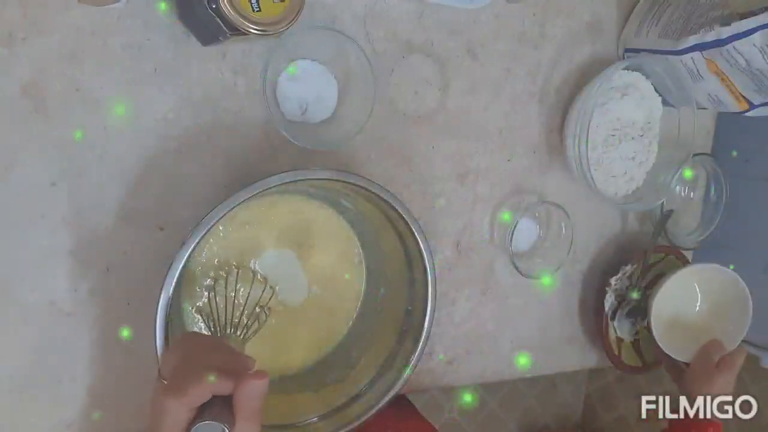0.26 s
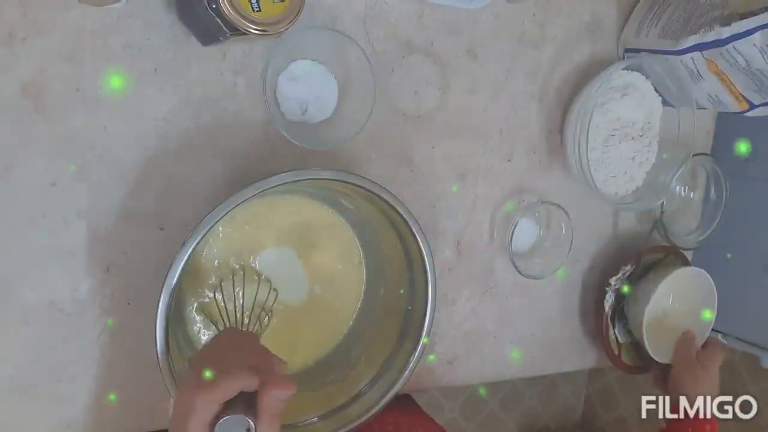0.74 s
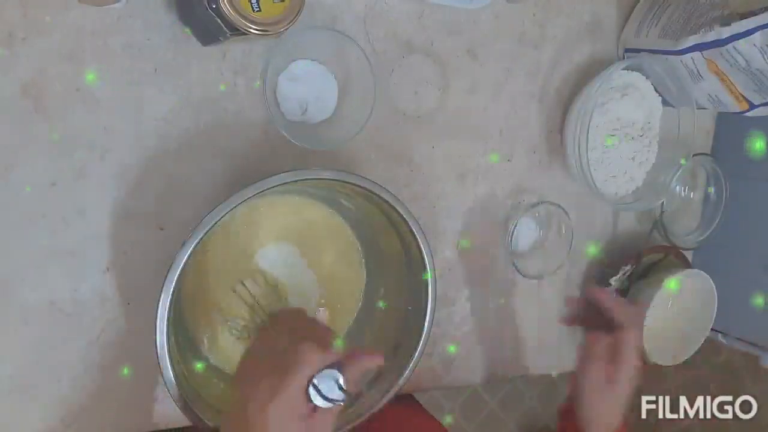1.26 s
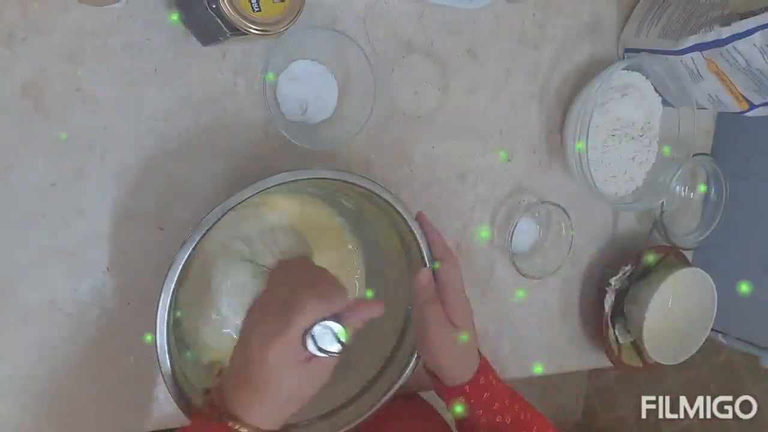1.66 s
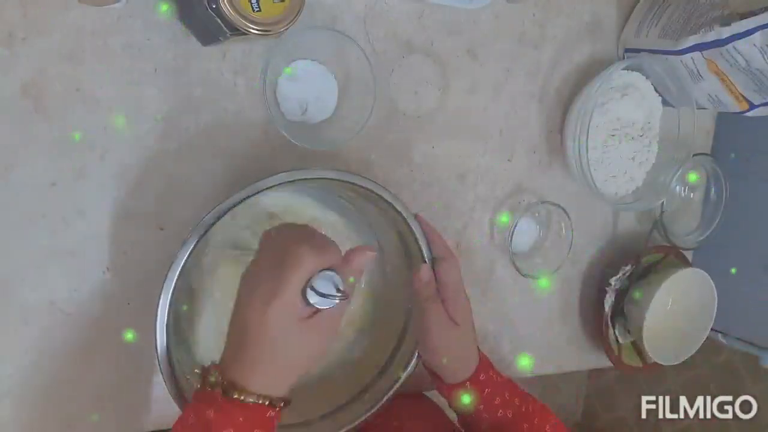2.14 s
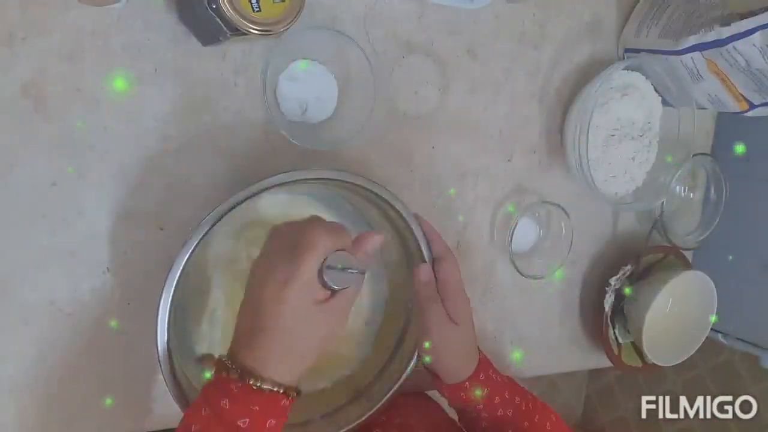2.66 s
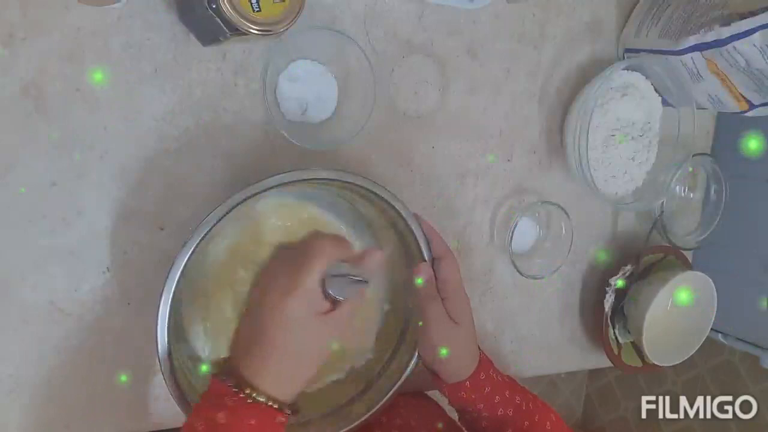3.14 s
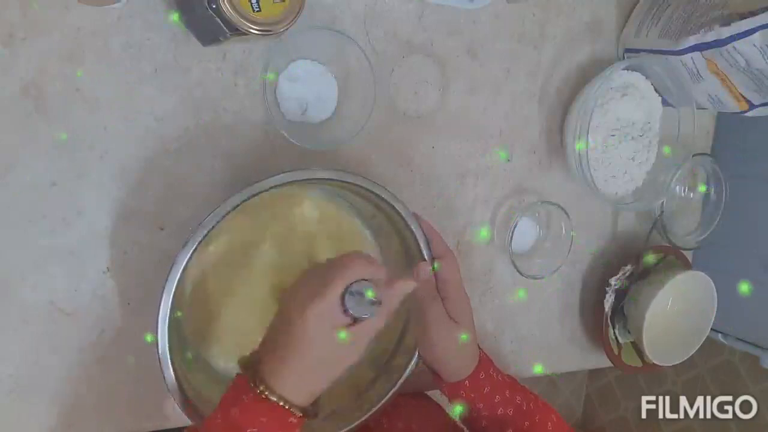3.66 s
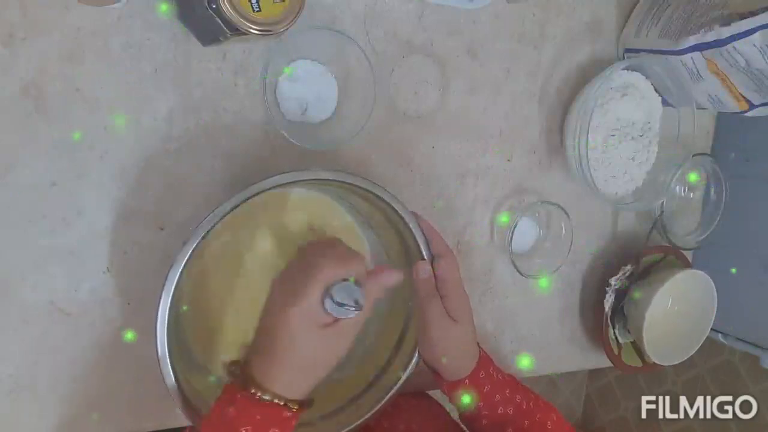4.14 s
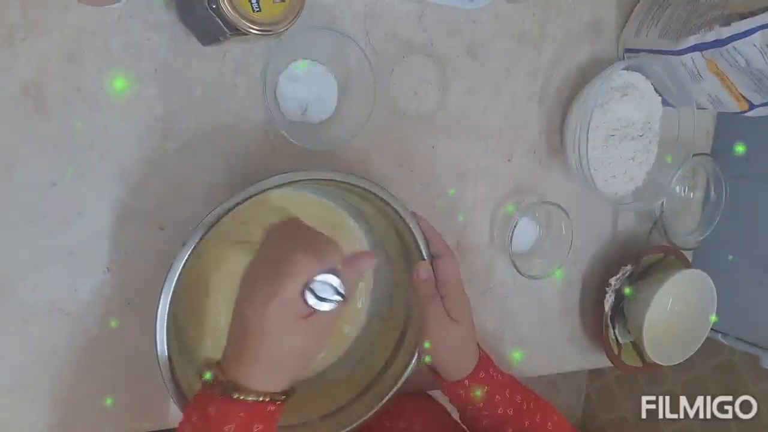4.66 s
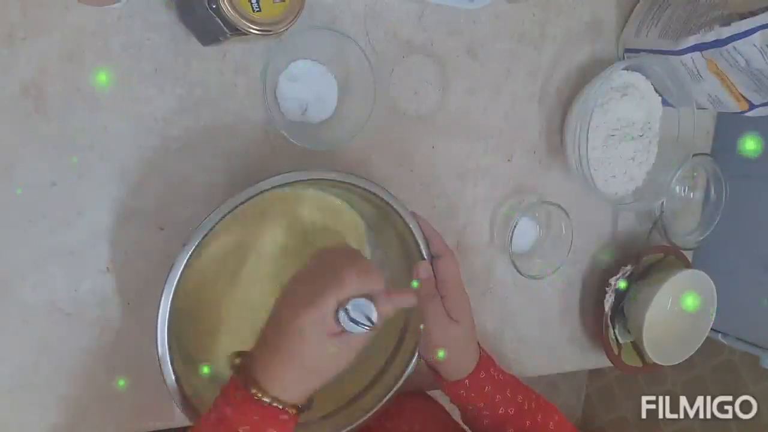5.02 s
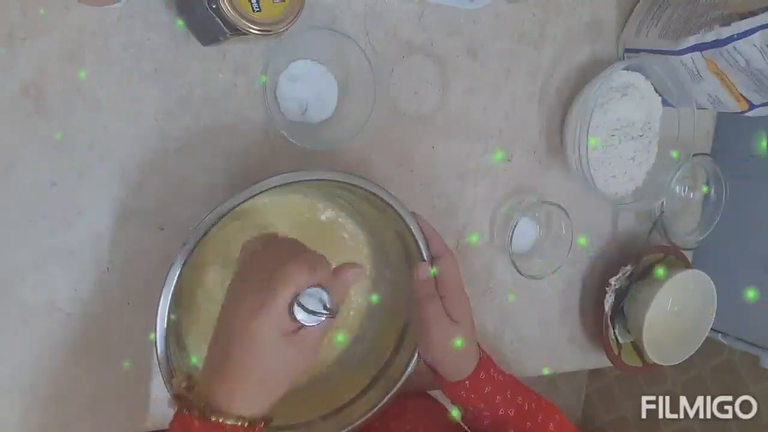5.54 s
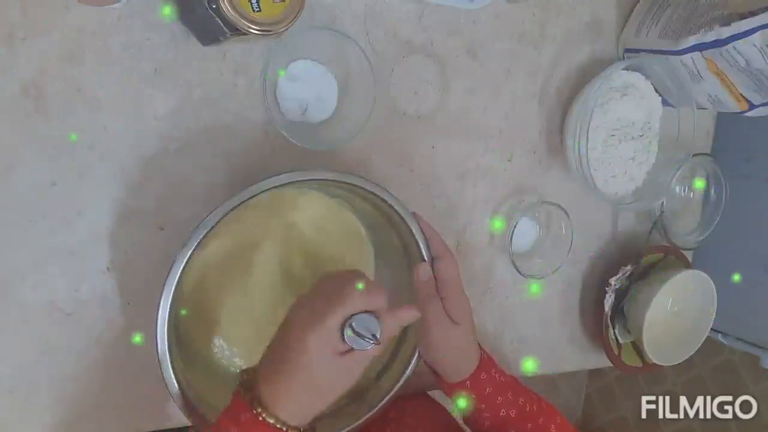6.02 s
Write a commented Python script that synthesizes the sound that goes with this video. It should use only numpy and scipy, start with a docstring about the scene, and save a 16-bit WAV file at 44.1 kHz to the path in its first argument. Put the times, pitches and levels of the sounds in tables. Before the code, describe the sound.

A cup clinks onto a china dish, then a wire whisk swishes through batter, clicking sharply against a ringing steel bowl.

```python
"""At a kitchen table, a cup is set down in a china dish, then batter is whisked in a steel bowl.
The wires swish and squelch through the batter, scrape the steel and click on the wall of the bowl,
which rings. An appliance hums in the room. The close stereo microphone has a limiter, which turns
the sound down for a moment on every hard click."""
import sys
import numpy as np
from scipy import signal
from scipy.fft import rfft, irfft, next_fast_len
from scipy.io import wavfile
from scipy.ndimage import uniform_filter1d

SR = 44100
rng = np.random.default_rng(int(sys.argv[2]) if len(sys.argv) > 2 else 0)


def file_out(sig):
    """Save sig as 16-bit WAV at sys.argv[1]."""
    # one column per channel
    cols = np.atleast_2d(sig).T
    # limit, then scale
    lim = np.clip(cols, -1, 1)
    pcm = np.round(lim * 32767).astype(np.int16)
    wavfile.write(sys.argv[1], SR, pcm)


N = 277279
TIME = np.arange(N) / SR
AGE = TIME[:SR]   # the second after a hit
HAND_ON_RIM_S = 1.6   # from here on a hand holds the bowl

# whisk hits on the bowl: t/s, level/dB, hardness/dB (negative = cushioned by batter),
# knock on the table/dB, hollow tone/dB, most excited f/Hz
WHISK_HITS = [ (0.9239, -22.5, 0.5, -4, 4.5, 3400), (1.3092, -26, 3.5, -11, 1, 3424),
              (1.3294, -25, -6, -1, 2, 3560), (1.5477, -3.5, -8, 5, 13.5, 4300),
              (1.6799, -3.5, -1, 5.5, 2.5, 5080), (1.9462, -0.5, -2, 0, 4.5, 7000),
              (2.4078, -19, -14, 8, 17.5, 1280), (3.434, -39, 3.5, 8, 18, 4420),
              (3.548, -2.5, -3, 8.5, 4, 4320), (3.8533, -5.5, -1, 3.5, 3, 5850),
              (4.6844, -3.5, 0, 10.5, 3, 5800), (4.9674, -2.5, -2, 5, 1, 6760),
              (5.253, -2.5, -5.5, 1, 1, 4020), (5.5788, -1, -5.5, -1.5, -0.5, 4100),
              (5.9123, -2.5, -4.5, -2, 0, 4880), (6.2282, -8.5, 1.5, -3, 5.5, 5170),
              (6.2355, -10.5, -0.5, -6, -7, 4570)]
# the bowl's modes, the notes it rings at: f/Hz, level/dB
BOWL_MODES = [(744, -2), (1254, -7), (1930, -5), (3405, -5), (3443, -1), (3535, -3), (3960, -3), (4046, 2),
              (4390, -4), (4668, 1), (5170, -1), (5565, -3), (5990, 0), (6467, -4), (6850, -6), (7112, -5),
              (7314, -1), (7755, -3), (8356, 0)]
# tone of wires sliding on wet steel: f/Hz, level/dB
SWISH_SPECTRUM = [(1500, -5.5), (2500, -2), (7300, 4), (9100, -14), (11800, -3), (14500, -10)]


def whisk_clicks(crack_db=-3, clang_db=-18, tail_db=-29.5, graze_db=-27, lead_s=.00045):
    """A wire grazes the bowl and hits it: a sharp crack, a short clang, then ringing and room echo."""
    # tone of the hit itself: f/Hz, level/dB
    click_spectrum = [(130, -46), (200, -42), (950, -18), (1590, -16), (1910, -7), (2600, -17), (3490, -7),
                      (7270, -0.5), (8580, -8.5), (9400, -17.5), (12400, -12.5), (16000, -33.5)]
    # the bowl's many faint modes, heard through the room: f/Hz, level/dB
    tail_spectrum = [(200, -32), (700, -9.5), (1400, -10), (1950, 0), (2400, -5), (3050, -3.5), (3450, 0.5),
                     (4600, 5.5), (8400, -6), (9300, -65), (11500, -9), (15500, -56)]
    hits, rings = np.zeros((2, 2, N))
    for s, db, hard, knock, hollow, excited_hz in WHISK_HITS:
        sustain = from_db(min(hard + 6, 0))   # batter cuts a soft hit short
        thud, sizzle = 2.95 * knock, .37 * (hard + knock)
        tint = [(200, thud), (450, knock), (1100, hollow), (1400, hollow), (2000, 0), (4600, 0),
                (6200, hard), (8300, hard), (10000, sizzle)]
        crack = stereo_noise(SR, alike=.15)
        crack[1] = np.roll(crack[1], int(lead_s * SR))   # the left microphone is nearer
        crack *= from_db(crack_db) * decay(.014 * sustain) / sustain * (1 - decay(.003))
        clang = sustain * from_db(clang_db) * stereo_noise(SR, alike=.15) * decay(.26)
        tail = sustain * from_db(tail_db) * stereo_noise(SR, alike=.21) * decay(.88) * (1 - decay(.032))
        faint_modes = resonances([], peak_db=0, width_hz=1, ripple_db=5)
        excited = resonances([(excited_hz, 0)], peak_db=5, width_hz=230, ripple_db=-1.5)
        click = shape_tone(crack + clang, click_spectrum, tint, excited)
        echo = shape_tone(tail, tail_spectrum, tint, faint_modes)
        add(hits, s, from_db(db) * (click + echo))
        graze = (stereo_noise(SR, alike=.32) * decay(.044))[:, SR // 20::-1]   # swells into the hit
        add(hits, s - 1 / 20, from_db(db + graze_db) * shape_tone(graze, tail_spectrum, tint))
        add(rings, s, bowl_ring(s, db, hard, hollow, excited_hz))
    wall = resonances(BOWL_MODES, peak_db=9, width_hz=90, ripple_db=4)
    return shape_tone(hits, wall) + rings


def bowl_ring(s, db, hard, hollow, excited_hz, ring_db=-33, main_hz=3450, choke_db=-5.5):
    """The steel rings after one hit; a hand on the rim shortens the ring and chokes its low notes."""
    # ring time, shorter for the low modes that batter damps: f/Hz, time to fade 60 dB/s
    ring_times = [(750, 0.26), (3450, 0.53), (8400, 0.55)]
    lightness = max(-2 - db, 0)   # a hit under -2 dB is a light touch
    if s < HAND_ON_RIM_S:
        low_modes = [(750, hollow / 3), (1300, hollow), (1900, 0)]
        stretch, split_hz, touch_db = 1.76, 2, .33 * lightness
    else:   # the hand and the moving batter also blur each note
        low_modes = [(750, choke_db), (1300, choke_db), (1900, choke_db / 2)]
        stretch, split_hz, touch_db = 1, 13, 0
    balance = low_modes + [(main_hz, 0), (8400, -6)]
    favoured_hz = min(BOWL_MODES, key=lambda mode: abs(mode[0] - excited_hz))[0]
    modes = []
    for hz, level in BOWL_MODES:
        level += at_hz(balance, hz) + 4.5 * (hz == favoured_hz)   # the spot hit favours one mode
        level -= 2.5 * lightness * abs(np.log2(hz / main_hz))   # a light touch rings mostly the main note
        modes.append((hz, level, at_hz(ring_times, hz) * stretch))
    gain = from_db(db + ring_db + touch_db + .58 * hard)
    return gain * ringing(modes, spread_db=2.5, split_hz=split_hz, count=3)


def whisk_turns(turn_s=.28, strong_db=-11):
    """Counts turns of the whisk: each strong hit ends one, and even turns fill the time between."""
    ends = np.array([s for s, db, *_ in WHISK_HITS if db > strong_db])
    between = np.maximum(np.round(np.diff(ends) / turn_s), 1)
    return np.interp(TIME, ends, np.r_[0, np.cumsum(between)])


def stirring(swish_db=-1.2, churn_db=-1.5, opening_treble_cut_db=-14, sweep_db=4.5, sweep_bright_db=4):
    """Wires swish over wet steel, louder and brighter on each sweep, and churn up gurgling bubbles."""
    # strength of the stirring: t/s, swish level/dB, churn level/dB
    stir_levels = [(0.0, -64, -76), (1.35, -63.5, -61), (1.73, -51, -57), (2.35, -52, -60),
                   (6.29, -54.5, -66.5)]
    # how much the swish pulses: t/s, depth (0 to 1)
    sweep_depth = [(1.2, 0), (1.5, 0.46)]
    # tone of the churning batter: f/Hz, level/dB
    churn_spectrum = [(300, -25), (652, 20), (840, -12), (1340, 1), (2020, 10.5), (3200, -41)]
    swish_level, churn_level = in_time(stir_levels)
    depth, = in_time(sweep_depth)
    sweep = depth * np.cos(2 * np.pi * whisk_turns())
    swish = shape_tone(stereo_noise(N, alike=0) + .35 * ticks(per_s=220), SWISH_SPECTRUM)
    dull = signal.sosfiltfilt(signal.butter(8, 8500, fs=SR, output="sos"), swish)
    opening = 1 - 2 * depth   # the hiss lacks top treble in the quiet opening
    swish = dull + (swish - dull) * from_db(opening_treble_cut_db * opening + sweep_bright_db * sweep)
    churn = shape_tone(.7 * stereo_noise(N, alike=.2) + .4 * ticks(per_s=110), churn_spectrum)
    churn = churn + .45 * gurgle()
    swish *= from_db(swish_db + swish_level + sweep_db * sweep + 2 * drift(25))
    churn *= from_db(churn_db + churn_level + 2 * drift(15))
    return swish + churn


def gurgle(per_s=70, low_hz=560, high_hz=2200, spread_db=14):
    """Small bubbles of uneven pitch and size pop at random moments."""
    out = np.zeros((2, N))
    for when, pitch, size, *phases in rng.random((int(per_s * N / SR), 5)):
        hz = low_hz * (high_hz / low_hz) ** pitch
        add(out, when * N / SR, from_db(spread_db * size) * bubble(hz, phases))
    return out / np.std(out)


def squelches(smack_db=-5, bubble_db=-9, room_db=-18, scatter_s=.02):
    """An air pocket in the batter tears open with a wet smack and breaks into four bubbles."""
    # bursting air pockets: t/s, level/dB, f/Hz
    pockets = [(1.434, -29.5, 2026), (2.364, -35.5, 1860), (2.719, -30.5, 2014), (2.726, -30, 698),
               (2.884, -35.5, 2040), (2.894, -35.5, 2610), (2.928, -34, 2580), (3.161, -41.5, 644),
               (3.205, -40, 1945), (4.051, -37.5, 1645), (4.076, -38, 1650), (4.342, -36.5, 2030),
               (4.39, -35, 655), (4.434, -34.5, 1323), (4.456, -31.5, 1427), (4.937, -28.5, 1950),
               (5.021, -29.5, 542), (5.208, -34.5, 1635)]
    smack_spectrum = [(350, -13), (650, 10), (2100, 8), (3000, 2.5), (7000, 8), (15000, -28)]
    out = np.zeros((2, N))
    for s, db, hz in pockets:
        smack = stereo_noise(SR, alike=.4) * decay(.05) * (1 - decay(.007))
        smack += from_db(room_db) * stereo_noise(SR, alike=.34) * decay(.77)
        pocket_peak = [(hz / 2, -4), (hz, 4), (hz * 2, -4)]
        add(out, s, from_db(db + smack_db) * shape_tone(smack, smack_spectrum, pocket_peak))
        for k, (late, octaves, *phases) in enumerate(rng.random((4, 4))):
            pitch = hz * 2 ** (octaves - .7) if k else hz
            start = s + scatter_s * late if k else s
            add(out, start, from_db(db + bubble_db - 4 * k) * bubble(pitch, phases))
    return out


def bubble(hz, phases, ring_s=.07):
    """A bubble rings briefly, rising a little in pitch, and lingers in the room."""
    age = AGE[:SR // 6]
    tone = np.sin(2 * np.pi * hz * age * (1 + .3 * age) + 2 * np.c_[phases])
    return tone * (decay(ring_s, age) + .1 * decay(.3, age)) * (1 - decay(.015, age))


def cup_on_dish(knock_db=-4, room_db=-15, ring_db=-14):
    """The cup lands and rocks once against the dish; the brighter knock brings out the higher notes."""
    # the two knocks: t/s, level/dB, brightness/(dB per octave)
    knocks = [(0.4695, -22.5, -0.68), (0.4933, -24, 0.31)]
    # tone of a knock on china: f/Hz, level/dB
    knock_spectrum = [(170, -9), (500, -8.5), (1330, 2), (2200, -2.5), (3000, -9.5), (5200, -4),
                      (7500, -11), (9300, -22.5), (15000, -33)]
    # notes the china rings at: f/Hz, level/dB, time to fade 60 dB/s
    china_modes = [(1306, 5.5, 0.18), (1394, -10.5, 0.82), (2514, -11, 0.77), (2670, -16, 0.74),
                   (3652, -5.5, 0.68), (5060, -1, 0.18), (5630, -15.5, 0.43)]
    out = np.zeros((2, N))
    for s, db, bright in knocks:
        fade = from_db(knock_db) * decay(.088) + from_db(room_db) * decay(.92)
        burst = stereo_noise(SR, alike=.066) * fade
        tilt = [(500, -2 * bright), (8000, 2 * bright)]
        china = resonances([(hz, 0) for hz, *_ in china_modes], peak_db=5, width_hz=130, ripple_db=8)
        knock = shape_tone(burst, knock_spectrum, tilt, china)
        modes = [(hz, level + 2 * at_hz(tilt, hz), t60) for hz, level, t60 in china_modes]
        ring = from_db(ring_db) * ringing(modes, spread_db=3.5, split_hz=5.87)
        add(out, s, from_db(db) * (knock + ring))
    return out


def scrapes(half_length_s=.057, treble_db=4, opening_treble_db=-14):
    """A wire sticks and slips along the wall in a crackling swell, squeaking at new pitches each time."""
    # drags along the wet steel: middle t/s, level/dB
    drags = [(0.18, -62.5), (2.5, -63), (2.761, -55), (3.008, -52), (4.432, -47.5)]
    out = np.zeros((2, N))
    swell = np.exp(-.5 * ((AGE - .5) / half_length_s) ** 2)
    for s, db in drags:
        slips = (stereo_noise(SR, alike=0) + 1.5 * ticks(per_s=500)[:, :SR]) / 1.8
        pitches = [(hz, 0) for hz in rng.uniform(4500, 12500, 5)]
        squeaks = resonances(pitches, peak_db=9, width_hz=300, ripple_db=4)
        tint = [(8000, 0), (10500, treble_db if s > HAND_ON_RIM_S else opening_treble_db)]
        scrape = from_db(db) * swell * shape_tone(slips, SWISH_SPECTRUM, tint, squeaks)
        before_start = int(max(.5 - s, 0) * SR)
        add(out, max(s - .5, 0), scrape[:, before_start:])
    return out


def singing_wires(level_db=-1, waver_db=2):
    """The thin wires keep singing faintly as the whisk moves."""
    # notes of the wires: f/Hz, level/dB
    notes = [(3042, -75), (4893, -69), (5206, -67)]
    # how strongly they vibrate: t/s, level/dB
    vibration = [(0, 6.5), (.45, -2), (3.2, -30), (4.4, 6), (6.29, -26)]
    swing_db, = in_time(vibration)
    tones = np.zeros((2, N))
    for hz, db in notes:
        strength = from_db(db + waver_db * drift(30))
        tones += strength * np.sin(2 * np.pi * (hz * TIME + rng.random((2, 1)) / 3))
    return np.sqrt(2) * from_db(level_db + swing_db) * tones


def table_rumble():
    """The bowl rumbles as it shifts on the table."""
    # shifts of the bowl: middle t/s, half length/s, level/dB
    shifts = [(1.583, 0.102, -49.5), (2.407, 0.02, -43.5), (4.047, 0.063, -47)]
    # tone of the rumble: f/Hz, level/dB
    rumble_spectrum = [(30, -23), (58, 7.5), (80, -4), (250, -47)]
    swells = sum(from_db(db) * np.exp(-.5 * ((TIME - s) / half) ** 2) for s, half, db in shifts)
    return swells * shape_tone(stereo_noise(N, alike=1), rumble_spectrum)


def room_hum():
    """An appliance hums and wavers over the low rush of the room's air."""
    # level of the hum and air, which sinks as the recorder turns its gain down: t/s, level/dB
    background_levels = [(0, -55.5), (1.2, -57.5), (5.0, -57.5), (6.29, -62.5)]
    # tone of the air: f/Hz, level/dB
    air_spectrum = [(25, -22), (48, 14), (70, 7.5), (110, 11.5), (220, -2), (430, 2.5), (1000, -15.5),
                    (1900, -6.5), (3000, -54)]
    # appliance hum: f/Hz, level/dB compared with the air
    hum_notes = [(147, -5.5)]
    level, = in_time(background_levels)
    hum = np.zeros(N)
    for hz, db in hum_notes:
        strength = np.sqrt(2) * from_db(db + 2 * drift(4.5))
        hum += strength * np.sin(2 * np.pi * hz * TIME + .5 * drift(42))
    air = shape_tone(stereo_noise(N, alike=.73), air_spectrum)
    return from_db(level) * (air + hum)


def ringing(modes, spread_db, split_hz, count=2, flutter=.5, flutter_per_s=60):
    """Each mode (f/Hz, level/dB, fade/s) is a few close tones that beat and flutter in the room."""
    out = np.zeros((2, SR))
    for hz, db, t60 in modes:
        wobble = np.interp(AGE * flutter_per_s, np.arange(flutter_per_s),
                           rng.standard_normal(flutter_per_s))
        strength = from_db(db + spread_db * rng.standard_normal()) * np.sqrt(2 / count)
        close_hz = hz + rng.normal(0, split_hz, (count, 1, 1))
        phases = rng.random((count, 2, 1), np.float32)
        tones = np.sin(2 * np.pi * (close_hz * AGE + phases)).sum(0)
        out += tones * strength * decay(t60) * (1 + flutter * wobble)
    return out


def resonances(modes, peak_db, width_hz, ripple_db):
    """A tone curve (f/Hz, level/dB): a peak at each clear mode, and a ripple for countless weak ones."""
    hz = np.arange(100, 16000, 12.)
    peaks = sum(from_db(db) / (1 + (2 * (hz - mode_hz) / width_hz) ** 2) for mode_hz, db in modes)
    ripple = uniform_filter1d(rng.standard_normal(len(hz)), size=3) * np.clip(hz / 3000, 0, 1)
    return np.transpose([hz, peak_db * np.minimum(peaks, 1) + ripple_db * ripple])


def shape_tone(x, spectrum, tint=None, body=None):
    """Filters x by three tone curves: spectrum and body keep white noise's power, tint adds its dB."""
    # a curve that changes nothing: f/Hz, level/dB
    flat = [(1000, 0)]
    size = 2 * next_fast_len(x.shape[-1] // 2 + 2048, True)
    hz = np.arange(size // 2 + 1) * SR / size
    shape, ripple, extra = [at_hz(flat if curve is None else curve, hz) * np.log(10) / 20
                            for curve in (spectrum, body, tint)]
    power = np.mean(np.exp(2 * shape)) * np.mean(np.exp(2 * ripple))
    # minimum phase: the filter rings after a hit, never before it
    cepstrum = irfft(shape + ripple + extra - np.log(power) / 2)
    cepstrum[1:size // 2] *= 2
    cepstrum[size // 2 + 1:] = 0
    return irfft(rfft(x, size) * np.exp(rfft(cepstrum)))[..., :x.shape[-1]]


def ticks(per_s, spread_db=5):
    """Tiny random ticks of uneven size, with an average power of 1."""
    moments = rng.random(N) < per_s / SR
    sizes = from_db(spread_db * np.minimum(rng.exponential(1, N), 2))
    pops = moments * sizes * rng.choice([-1, 1], N) * (.5 + rng.random((2, N)))
    return pops / np.sqrt(np.mean(pops ** 2) + 1e-20)


def stereo_noise(size, alike):
    """White noise; alike (0 to 1) is the part that left and right share."""
    shared = np.sqrt(alike) * rng.standard_normal(size)
    return shared + np.sqrt(1 - alike) * rng.standard_normal((2, size))


def drift(per_s):
    """Wanders at random, by about 1 either way."""
    return np.interp(TIME * per_s, np.arange(4096), rng.standard_normal(4096))


def decay(t60, age=AGE):
    """Fades 60 dB in t60 seconds."""
    return np.exp(-np.minimum(np.log(1000) * age / t60, 40))


def from_db(db):
    """Turns decibels into a gain."""
    return 10 ** (np.asarray(db) / 20)


def in_time(rows):
    """Reads each column of a time table at every sample."""
    s, *columns = np.transpose(rows)
    return [np.interp(TIME, s, column) for column in columns]


def at_hz(points, hz):
    """Reads a curve at hz, with octaves evenly spaced."""
    known_hz, values = np.transpose(points)
    return np.interp(np.log(hz + 1), np.log(known_hz), values)


def add(out, s, sound):
    """Mixes a sound in at s seconds."""
    at = int(np.clip(s * SR, 0, N - 1))
    out[:, at:at + sound.shape[1]] += sound[:, :N - at]


def scene():
    """All the sounds together, with the clicks and the cup slightly to the left."""
    hits = (whisk_clicks() + cup_on_dish()) * from_db([[.4], [-.4]])
    return hits + squelches() + scrapes() + stirring() + singing_wires() + room_hum() + table_rumble()


def record(dry, limit_db=-18, release_db_per_s=35, attack_s=.021, cutoff_hz=15800):
    """A limiter turns loud moments down fast and recovers slowly; peaks are rounded, top treble cut."""
    power = uniform_filter1d(np.mean(dry ** 2, axis=0), size=88)
    level_db = 10 * np.log10(np.maximum(power, 1e-12))
    recovery = release_db_per_s * TIME
    cut_db = np.maximum.accumulate(np.maximum(level_db - limit_db, 0) + recovery) - recovery
    hold = np.exp(-1 / (attack_s * SR))
    limited = dry * from_db(-signal.lfilter([1 - hold], [1, -hold], cut_db))
    lowpass = signal.ellip(10, .2, 80, cutoff_hz, fs=SR, output="sos")
    return signal.sosfilt(lowpass, np.tanh(limited))


dry = scene()
out = record(dry)
file_out(out)
```